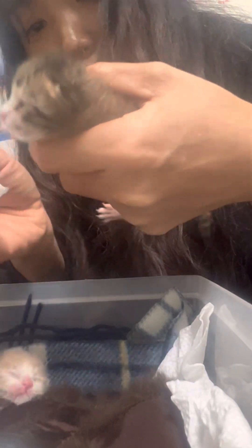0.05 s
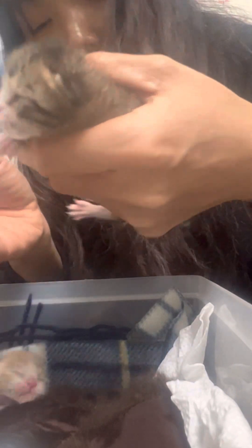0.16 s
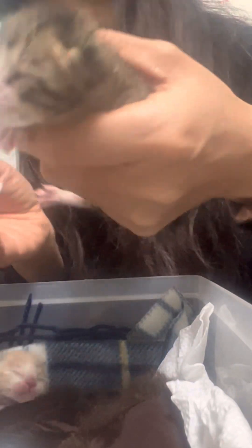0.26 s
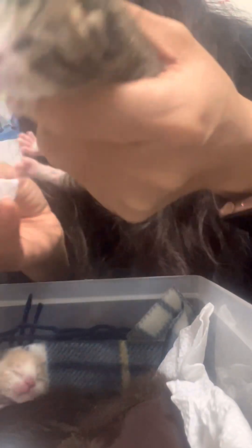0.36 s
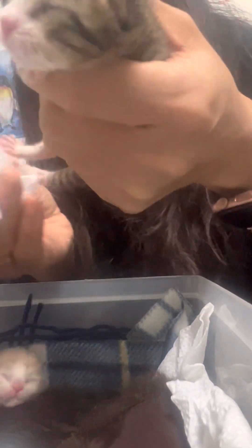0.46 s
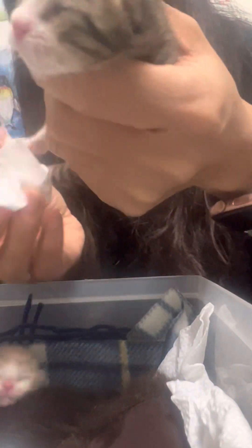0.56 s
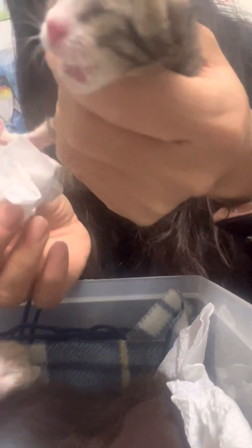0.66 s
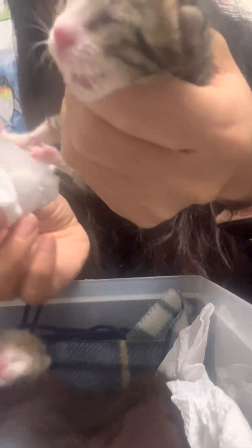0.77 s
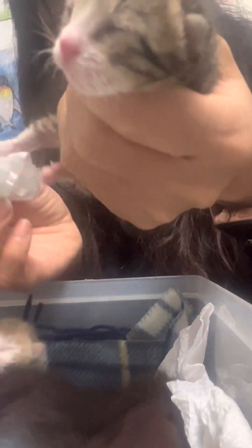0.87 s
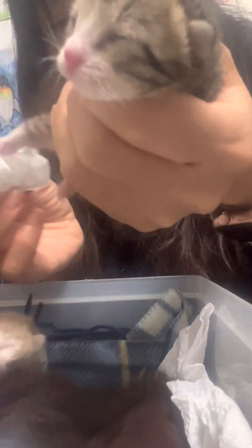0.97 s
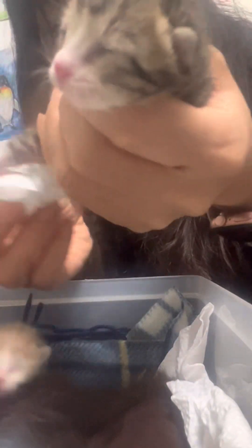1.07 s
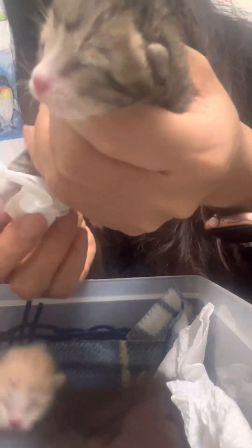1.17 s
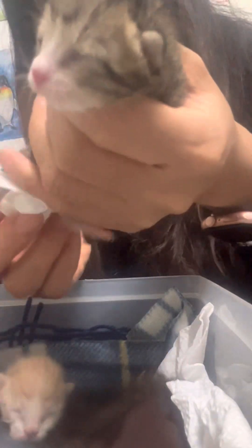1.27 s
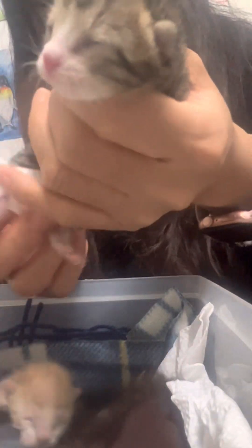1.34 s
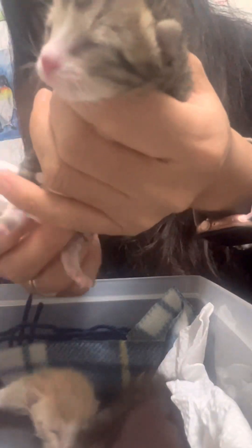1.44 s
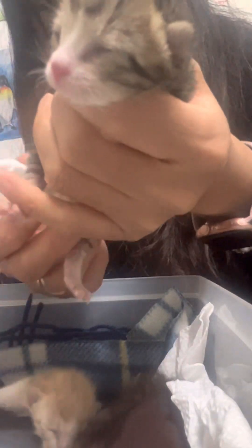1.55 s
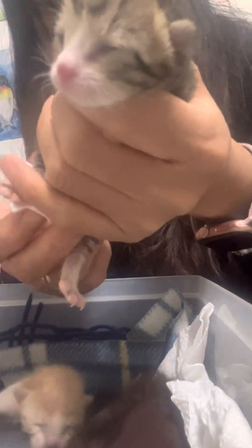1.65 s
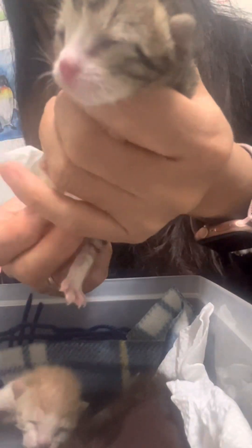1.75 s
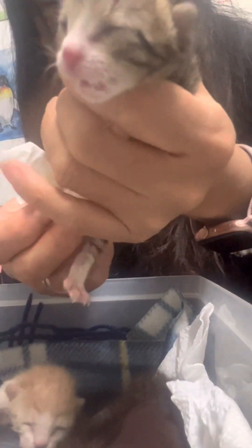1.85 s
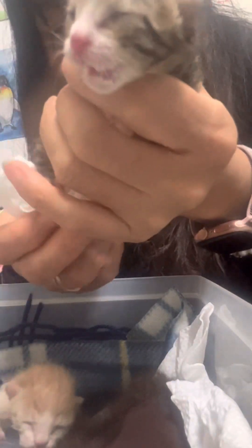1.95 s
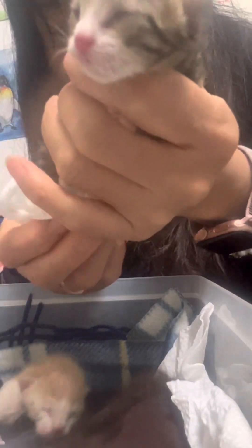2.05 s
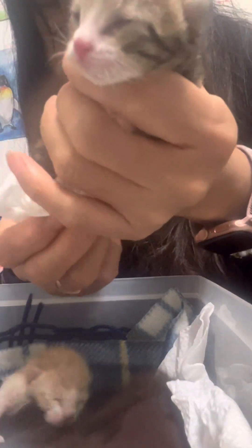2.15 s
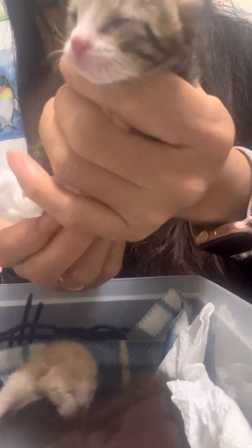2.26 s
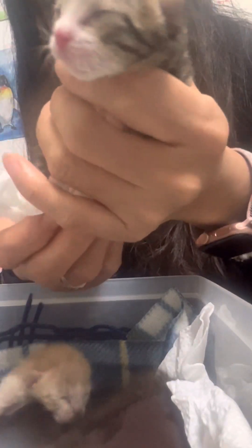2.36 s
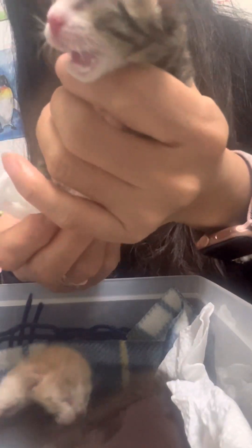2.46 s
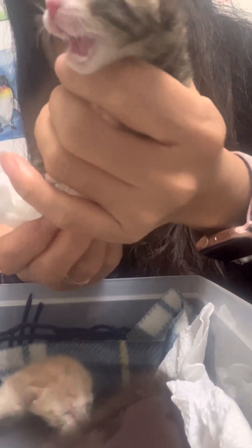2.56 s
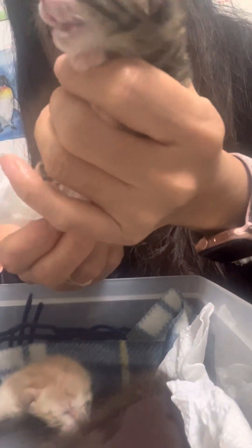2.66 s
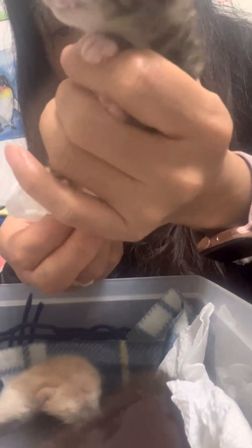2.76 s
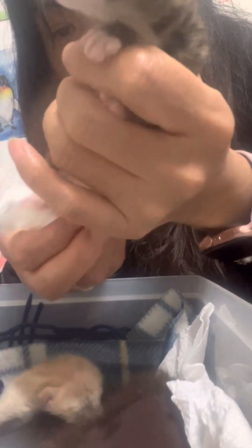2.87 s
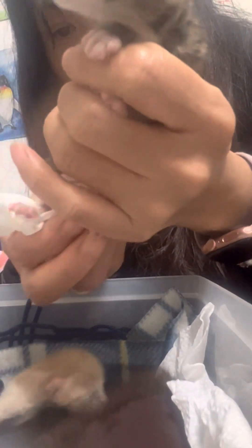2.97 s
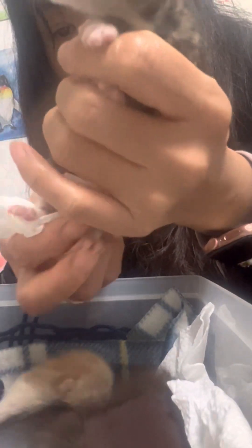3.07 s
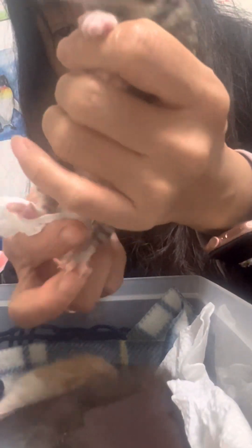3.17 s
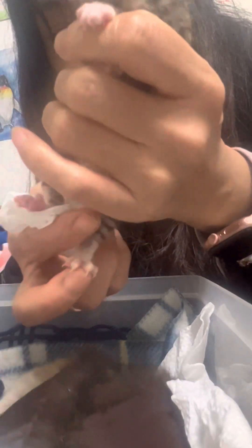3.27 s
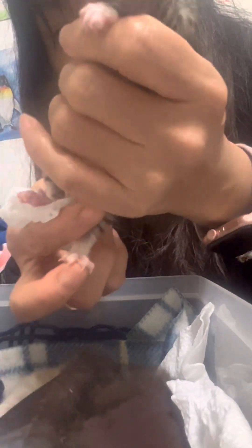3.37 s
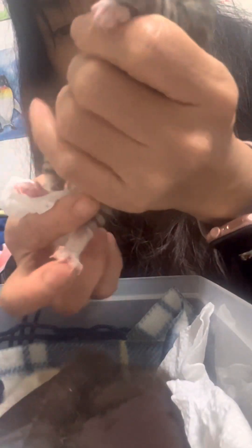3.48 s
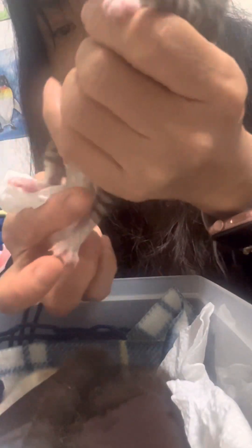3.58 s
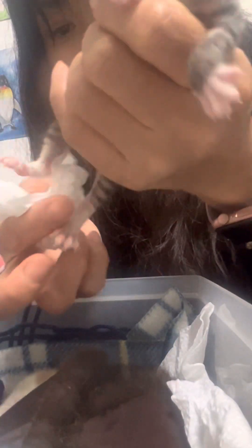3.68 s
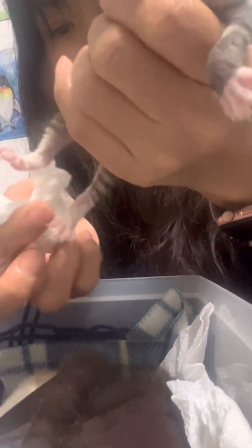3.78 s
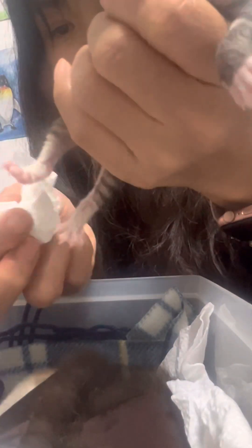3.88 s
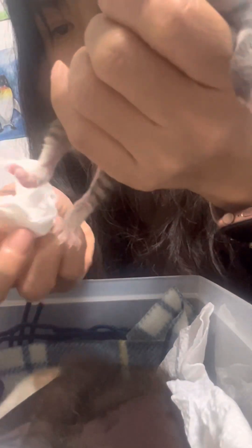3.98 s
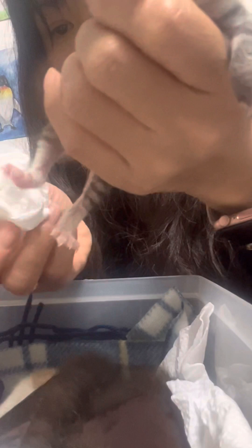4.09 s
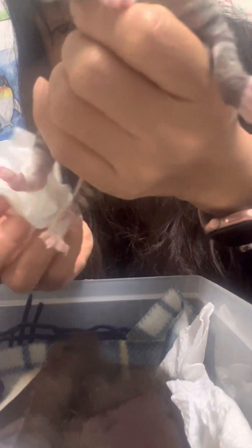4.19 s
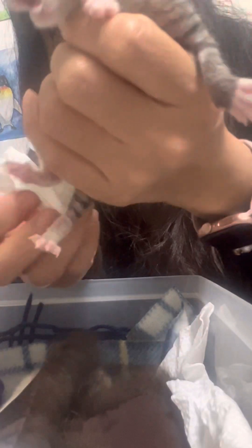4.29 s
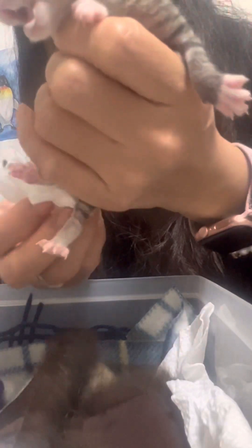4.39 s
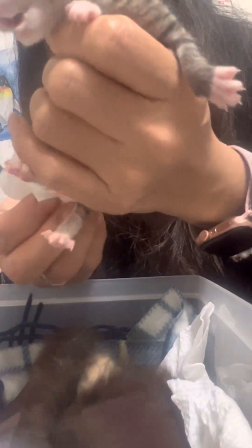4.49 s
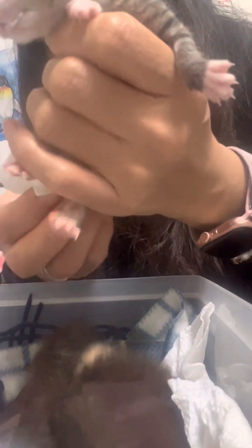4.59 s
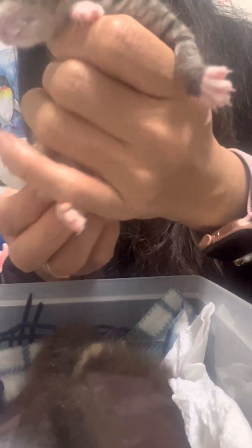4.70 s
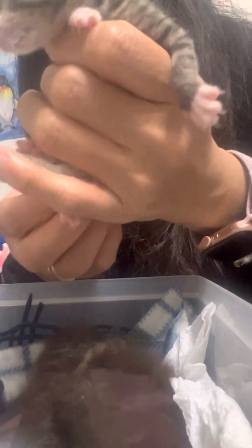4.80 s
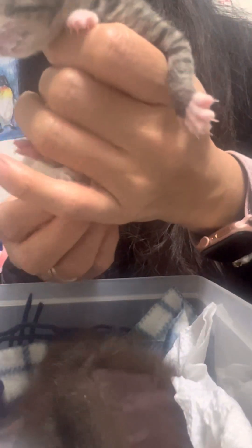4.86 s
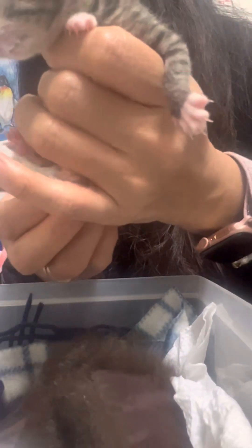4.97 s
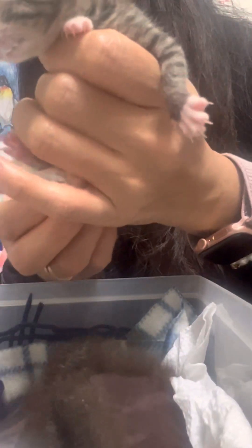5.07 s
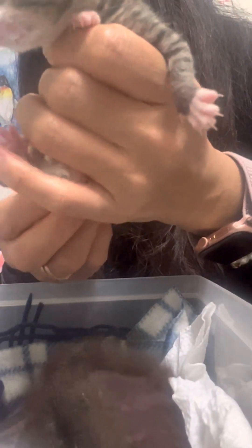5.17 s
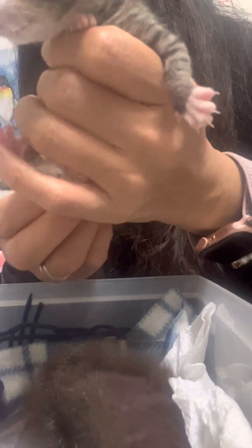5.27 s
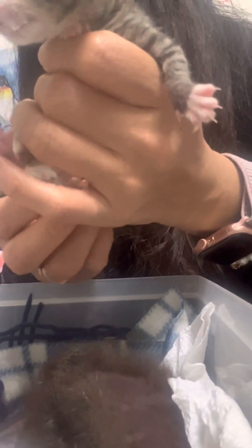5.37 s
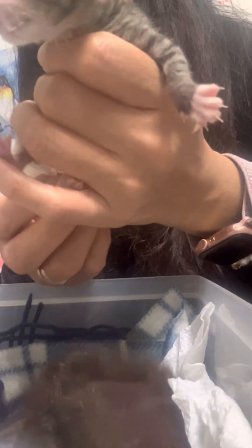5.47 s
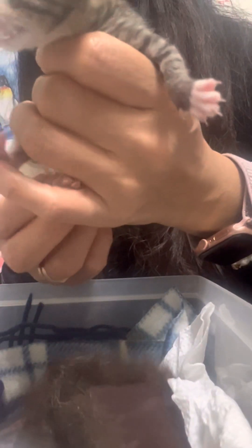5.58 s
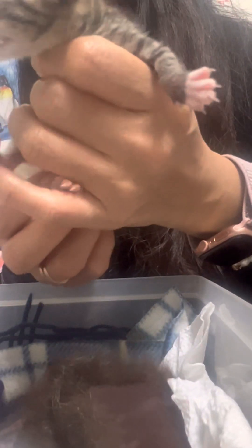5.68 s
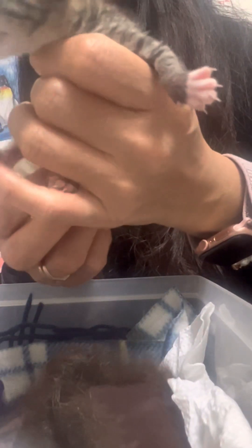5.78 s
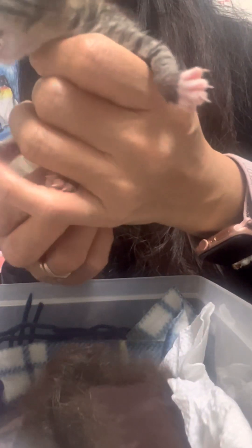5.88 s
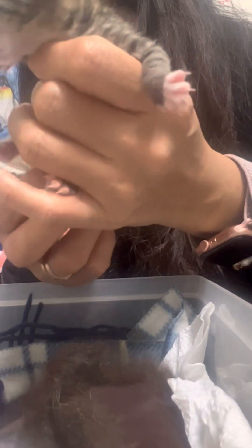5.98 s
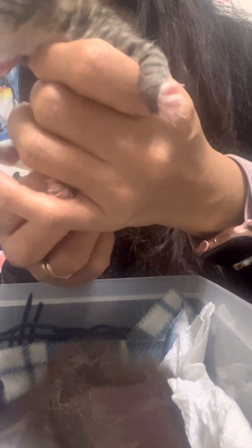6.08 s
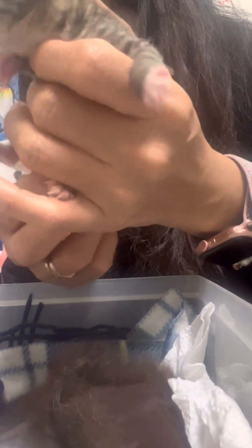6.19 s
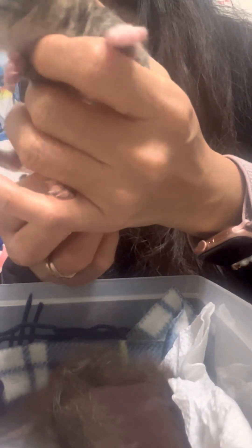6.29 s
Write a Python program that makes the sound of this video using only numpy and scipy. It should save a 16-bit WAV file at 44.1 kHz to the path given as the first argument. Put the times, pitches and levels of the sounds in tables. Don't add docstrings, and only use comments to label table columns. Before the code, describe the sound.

Close phone pickup in a small room: soft tissue rustle and low grip rumble under newborn kitten cries. A littermate's long whines glide up and down first, joined by a loud piercing mew and a cluster of dull knocks. More mews and scuffs follow, the whining stops, and the held kitten carries on alone with a hoarse low mew, a bright wide cry, a weak squeak and a last airy arch.

```python
import sys
import numpy as np
from scipy import signal
from scipy.fft import rfft, irfft, next_fast_len
from scipy.io import wavfile
from scipy.ndimage import uniform_filter1d

SR = 44100
rng = np.random.default_rng(int(sys.argv[2]) if len(sys.argv) > 2 else 0)


def gain_from_db(level_db):
    decades = np.asarray(level_db, float) / 20
    return 10 ** decades


def file_out(sig):
    cols = np.atleast_2d(sig).T
    lim = np.clip(cols, -1, 1)
    pcm = np.round(lim * 32767).astype(np.int16)
    wavfile.write(sys.argv[1], SR, pcm)


N = 279594

# frequency in Hz, level in dB per Hz.
RUSTLE_SPECTRUM = [(180, -38.5), (300, -18.5), (498, -13.5), (670, -17), (719, -10.5), (1180, -15),
                   (1480, -19), (1750, -6.5), (2150, -1), (2550, -7), (3250, -17), (3960, -13.5),
                   (4900, -23), (6490, -20), (8730, -36.5), (11300, -87), (19200, -120)]
# frequency in Hz, level in dB per Hz.
RUMBLE_SPECTRUM = [(15, -41.5), (30, -4.5), (66, 4), (125, -3), (190, -4.5), (360, -10), (600, -56)]
# frequency in Hz, level against the sum in dB.
RUSTLE_SIDE = [(60, -30.5), (100, -18), (180, -27), (310, -13.5), (540, -11.5), (930, -8.5), (1600, -18),
               (2770, -35.5), (4790, -9.5), (8280, 0)]
# frequency in Hz, level in dB per Hz.
HISS_SPECTRUM = [(300, -110), (7000, -108), (9000, -121), (11500, -114), (14000, -115), (15000, -124),
                 (16000, -150)]
# middle in seconds, half length in seconds, level in dB.
WIPES = [(0.0, 0.16, -63.5), (0.607, 0.86, -61), (1.319, 0.2, -61.5), (2.048, 0.35, -60),
         (2.636, 0.23, -59.5), (3.445, 0.38, -65.5), (3.899, 0.055, -66.5), (4.098, 0.12, -69),
         (4.41, 0.42, -60.5), (4.863, 0.58, -66), (5.18, 0.11, -73), (5.454, 0.075, -67), (5.6, 0.46, -69),
         (6.2, 0.45, -63)]
# middle in seconds, half length in seconds, level in dB.
GRIP_SHIFTS = [
    (.2, 0.69, -74),
    (.8, 0.44, -73),
    (1.6, 0.29, -78),
    (2.292, 0.38, -78),
    (3.1, 0.53, -80.5),
    (4.1, 0.12, -79),
    (4.478, 0.37, -70),
    (5.1, 0.38, -73),
    (5.847, 0.45, -69.5),
    (6.34, 0.14, -67.5),
]
# start in seconds, length in seconds, level in dB.
SCRAPES = [
    (0.786, 0.14, -57.5),
    (2.251, 0.027, -55.5),
    (2.303, 0.082, -67.5),
    (2.457, 0.037, -53.5),
    (2.526, 0.13, -70.5),
    (2.66, .08, -61),
    (3.145, 0.1, -69),
]
# start in seconds, peak level in dB, frequency in Hz.
KNOCKS = [(0.774, -51, 171.6), (0.809, -47, 115), (0.829, -49, 260), (0.849, -45.5, 181), (0.865, -48, 130),
          (0.879, -56, 407), (0.908, -52, 83.6), (1.11, -57, 90), (1.617, -55, 105.3), (2.224, -65, 386),
          (2.265, -50, 422), (2.315, -54, 515), (2.365, -51, 453), (2.465, -54, 472), (2.488, -49, 360),
          (2.519, -46.5, 403), (2.544, -49.5, 456), (2.589, -60, 530), (4.037, -58, 119),
          (4.556, -53.5, 317), (4.639, -54, 184), (4.889, -53, 191), (5.056, -67, 236), (5.679, -57.5, 238),
          (6.167, -58.5, 171)]
# start in seconds, peak level in dB, frequency in Hz.
TICKS = [
    (.2868, -34.5, 2150),
    (0.2947, -33.5, 2090),
    (4.256, -54, 7500),
    (4.497, -54, 7000),
    (5.487, -49, 2100),
    (5.666, -50, 2090),
    (2.51, -45, 3600),
]

# frequency in Hz, level in dB.
NEAR_COLOUR = [(300, -8), (800, -8), (1200, -18), (1700, -4), (2300, 0), (2900, -6), (3800, 0), (5200, -6),
               (6500, -6), (7500, -8), (8000, -20), (8500, -36), (9500, -55), (12500, -38), (15000, -55)]
# frequency in Hz, level in dB.
BOX_COLOUR = [(250, -4), (600, 6.5), (1100, -3.5), (1600, 1.5), (2300, -2), (2900, -7.5), (3500, -20.5),
              (4200, -7), (6000, -34), (9500, -42.5)]
# frequency in Hz, level against the sum in dB, phase in radians.
NEAR_PORTS = [(600.0, -7.3, -2.0), (800.0, -2.5, -3.1), (1000.0, 4.3, -3.4), (1200.0, 14.3, -5.0),
              (1500.0, -10.2, -7.1), (1900.0, -18.6, -6.1), (2300.0, -11.0, -6.1), (2800.0, 1.7, -7.2),
              (3300.0, -4.5, -9.6), (3800.0, -2.6, -9.7), (4400.0, -1.8, -9.3), (5000.0, 0.5, -8.4),
              (5800.0, -4.0, -7.4), (7000.0, -2.1, -7.8)]
# frequency in Hz, level against the sum in dB, phase in radians.
BOX_PORTS = [(400.0, -15.2, -1.5), (600.0, -11.0, -1.6), (800.0, -2.8, -1.9), (1100.0, -2.2, -3.5),
             (1400.0, -0.4, -4.4), (1800.0, -16.5, -4.5), (2300.0, -12.8, -4.5), (2900.0, -5.8, -4.7),
             (4000.0, -10.4, -5.4)]

# time in seconds, pitch in Hz, effort in dB.
WHINES = [
    [(0.0, 306, -65.5), (0.062, 261.3, -72.5), (0.078, 286.7, -68.5), (0.15, 342, -67.5),
     (0.205, 335, -67.5)],
    [(0.195, 337, -71), (0.35, 609, -57.5), (0.404, 540, -56.5), (0.534, 553, -58), (0.645, 733.5, -58),
     (0.75, 796, -51), (0.806, 696, -58), (0.914, 381, -66), (0.955, 358, -60.5)],
    [(0.945, 371, -62), (0.992, 373.3, -67), (1.05, 448, -59), (1.085, 595, -57.5), (1.127, 616, -56.5)],
    [(1.124, 650, -54), (1.165, 654, -51.5), (1.19, 669, -51), (1.22, 718, -49), (1.29, 686, -47),
     (1.358, 651, -47.5), (1.375, 559, -53.5), (1.4, 427, -66)],
    [(2.03, 238.4, -63.5), (2.15, 432.6, -58.5), (2.194, 562.6, -56.5), (2.264, 752.6, -53.5),
     (2.38, 794, -54), (2.426, 875, -52), (2.52, 808, -56), (2.634, 608.5, -57.5), (2.72, 388.5, -73)],
]
# mouth resonance in Hz, tilt at full effort in dB per octave.
WHINE_VOICES = [
    (1500, 1.5),
    (1520, 4.5),
    (2200, 4.5),
    (2200, 4.5),
    (2200, 4),
]
# start and end in seconds, frequency in Hz, level in dB.
BOX_TONGUE = [
    (0.77, 1.125, 2100, -6),
    (1.125, 1.37, 2170, 4.5),
    (2.483, 2.52, 1230, -19.5),
    (1.2, 1.36, 1300, -4),
    (1.12, 1.19, 1100, 2),
    (2.19, 2.25, 920, -8),
    (1.125, 1.36, 3900, -4),
    (1.0, 1.125, 3000, -6),
]

# time in seconds, pitch in Hz, effort in dB, mouth resonance in Hz.
EARLY_MEWS = [
    [(0.243, 809, -50.5, 1940), (0.261, 837, -37.5, 1850), (0.267, 836, -43.5, 1820)],
    [(0.56, 801.4, -79, 2167), (0.602, 988, -49, 2060), (0.624, 1028, -37.5, 2190), (0.69, 1177, -28, 2370),
     (0.8, 1122, -27, 2636), (0.93, 818, -38.5, 1870), (0.965, 786, -42, 1600), (1.004, 729, -40.5, 1720),
     (1.012, 704, -47, 1998)],
    [(1.73, 771, -72.5, 1770), (1.765, 850.5, -42, 1850), (1.803, 868.7, -41, 1730),
     (1.871, 837, -40, 2160), (1.9, 775, -38, 2090), (1.927, 747, -40.5, 2010), (1.95, 790, -38.5, 2050),
     (1.977, 812, -37, 2070), (2.007, 805, -37, 2000)],
    [(2.39, 750, -64, 2150), (2.408, 736.7, -40, 2080), (2.44, 792, -36, 2060), (2.5, 827, -36, 2530),
     (2.586, 787, -40, 2020), (2.668, 704.5, -46, 1930), (2.74, 557, -46.5, 1760), (2.749, 530, -55, 1800)],
]
# time in seconds, pitch in Hz, effort in dB, mouth resonance in Hz.
LATE_MEWS = [
    [(3.144, 643.3, -53, 1920), (3.195, 723.3, -43.5, 2000), (3.253, 699, -49.5, 1870),
     (3.335, 789, -42, 2070), (3.409, 721.5, -44, 1860), (3.471, 592.4, -52, 1810),
     (3.511, 631, -50.5, 1730), (3.592, 547, -50.5, 1500)],
    [(4.229, 634, -54, 2120), (4.28, 765.6, -42, 2150), (4.335, 847, -41, 3070), (4.37, 874, -35, 3380),
     (4.422, 925, -36.5, 3350), (4.451, 939, -32.5, 3580), (4.462, 924, -38.5, 3440),
     (4.562, 775, -39, 2800), (4.617, 674, -45.5, 2060)],
    [(5.391, 635, -56, 1900), (5.418, 645, -59, 1950), (5.43, 654, -62, 2000), (5.447, 666, -58.5, 2050),
     (5.471, 630, -48, 1840), (5.479, 614, -54, 1950)],
    [(5.8, 714.5, -62.5, 1650), (5.834, 794, -57.5, 2310), (5.894, 919, -49, 3300),
     (6.022, 1014, -33, 3900), (6.07, 946.4, -34.5, 3870), (6.142, 922, -44, 3170), (6.196, 835, -42, 2300),
     (6.222, 831, -49.5, 1700), (6.295, 728, -46.5, 1500)],
]
# tilt in dB per octave, throat resonance in Hz,
# its strength in dB, roughness gained per dB of lost effort.
MEW_VOICES = [
    (3.5, 4400, -23.5, -0.5),
    (1.5, 5450, -24, -0.1),
    (1.4, 3430, -15, -0.5),
    (-0.5, 3650, -10.5, 0.028),
    (3, 3350, -13.5, -0.1),
    (0, 7700, -11, .03),
    (2, 3300, -18.5, -4),
    (-2.5, 6900, -11.5, .018),
]
# share of the voice 0-1, onset in seconds, # hiss at the teeth against that
# in the mouth 0-1, frequency in the mouth in Hz.
MEW_AIR = [
    (.03, .26, .2, 3900),
    (.035, .8, .15, 3000),
    (.03, 1.93, .2, 3900),
    (.04, 2.51, .5, 3900),
    (.07, 3.2, .9, 3900),
    (.065, 4.449, .35, 4100),
    (.06, 5.46, .2, 3900),
    (.055, 5.88, .3, 4100),
]
# start in seconds, peak level in dB, frequency in Hz.
GULPS = [
    (0.263, -34, 796),
    (1.007, -37, 840),
    (2.006, -26.5, 813),
    (2.745, -38.5, 862),
    (3.592, -49.5, 877),
    (4.617, -48, 880),
    (5.474, -50, 780),
    (6.287, -48, 904),
]
# start in seconds, end in seconds.
GAPES = [
    (.61, 0.93),
    (1.83, 2.04),
    (2.419, 2.92),
    (3.21, 3.5),
    (4.257, 4.5),
    (5.85, 6.15),
]
# middle in seconds, half length in seconds, level in dB.
THROAT_RINGS = [
    (0.66, 0.095, 5.5),
    (0.826, 0.011, 5),
    (2.567, 0.08, 7),
    (2.665, 0.057, 1.5),
    (3.432, 0.15, 6),
    (4.321, 0.048, 8.5),
    (5.872, 0.068, 4),
    (6.02, 0.041, 1.5),
]
# start in seconds, end in seconds, frequency in Hz, level in dB.
TONGUE = [(2.483, 2.52, 1650, -9.5), (2.508, 2.6, 4030, 6), (2.45, 2.6, 6300, 1.5), (2.6, 2.69, 5700, 6),
          (2.67, 2.745, 4000, 5.5), (2.69, 2.76, 5990, -17), (3.14, 3.225, 2140, 3.5),
          (3.14, 3.25, 3000, -6), (3.24, 3.31, 7140, 9.5), (3.33, 3.43, 5900, 6.5), (3.3, 3.7, 3360, 4),
          (3, 3.45, 4940, -2.5), (3.47, 3.6, 6200, -10), (3.8, 3.9, 4300, 2.5), (3.51, 3.6, 1600, 3.5),
          (4.265, 4.34, 6500, 5), (4.35, 4.41, 7170, 7), (4.26, 4.44, 5400, -3.5), (4.41, 4.45, 7500, -7),
          (4.27, 4.35, 3950, 5.5), (4.52, 4.59, 3400, 2.5), (4.53, 4.62, 6500, -8.5),
          (5.385, 5.47, 3500, 6.5), (5.385, 5.49, 2700, -14.5), (5.385, 5.49, 1250, -13),
          (5.86, 5.97, 4700, 10.5), (5.97, 6.13, 3970, 3), (4.5, 8.9, 9500, 1.5), (5.97, 6.9, 5880, 0.5),
          (6.12, 6.19, 5230, 13.5), (6.21, 5, 5200, -8), (6.24, 6.3, 1560, 9), (.75, .87, 3350, 5.5),
          (0.98, 1.01, 2320, -1), (1.7, 1.93, 2600, -2), (3.46, 4.3, 7200, -14), (2.62, 2.76, 7500, -10),
          (6.15, 6.3, 6500, -10.5), (5.85, 6.15, 7970, -9.5), (4.45, 4.48, 6600, 6.5),
          (0.71, .72, 9000, 13), (1.79, 1.95, 8890, 32), (2.42, 2.58, 9050, 26), (4.28, 4.49, 9000, 21.5),
          (5.85, 6.04, 8900, 22.5), (4.37, 4.45, 3700, 2), (.64, .82, 5200, 4), (2.4, 2.47, 2300, 2),
          (.62, .76, 4900, -4), (4.5, 4.62, 7800, -9)]
# start
# in seconds, end in seconds, frequency in Hz, level in dB.
MORE_TONGUE = [(.24, .28, 3400, -7), (.24, .28, 4250, -6), (.24, .28, 5100, -22), (3.14, 3.2, 5000, -8),
               (1.9, 2.0, 3200, 3), (.24, .265, 850, -7), (0.724, 0.829, 4600, 6), (1.78, 1.871, 5560, -13),
               (1.863, 1.96, 1200, -3), (1.999, 2.01, 1800, 7), (2.458, 2.506, 3250, 5.5),
               (2.518, 2.559, 1610, 5.5), (3.202, 3.26, 1419, -4), (3.52, 3.588, 2900, -6),
               (4.363, 4.5, 1850, 5.5), (4.395, 4.49, 2760, -8.5), (5.82, 5.988, 2800, -6.5),
               (6.17, 6.3, 800, -3.5)]
# time in seconds, strength 0-1, length in seconds.
CRACKS = [(1.009, 0.92, 0.0021), (1.381, 0.64, 0.013), (2.521, 0.02, 0.0075), (2.742, 0.24, 0.0088),
          (3.155, 0.33, 0.013), (3.222, 0.17, 0.02), (4.235, 0.35, 0.005), (6.071, 0.14, 0.012),
          (3.478, .3, .025), (.1, 0.28, .12), (0.808, 0.06, 0.0073), (4.62, 0.4, 0.014), (5.392, 0.5, .005),
          (5.481, 0.27, 0.01), (6.272, 0.03, 0.014)]
# time in seconds, share of the pitch, length in seconds.
CATCHES = [(0.762, 0.016, .005), (.808, 0.015, .006), (2.004, -0.038, 0.0033), (3.151, .03, 0.0041),
           (3.383, 0.014, 0.0096), (4.264, 0.014, .01), (4.302, 0.011, .012), (4.339, 0.014, .008),
           (4.47, .01, .01), (4.535, -0.0085, .012), (5.892, 0.0076, .012), (6.008, .008, .01),
           (6.149, 0.013, 0.0095), (1.216, 0.01, 0.011), (1.104, -0.014, .015), (2.197, .03, 0.0078),
           (2.257, .02, .008), (2.226, -.035, .018), (4.517, -.012, .015), (6.058, 0.022, .012),
           (6.238, -0.026, .01), (3.318, .014, 0.014), (3.354, -0.015, 0.0086)]

STILL_RUSTLE_DB, STILL_RUMBLE_DB = -78, -83.5
SCRAPE_RISE_S, SCRAPE_FALL_DB_PER_S = 0.0041, 329
MASK_FROM_DB, MASK_SPAN_DB, MASK_DEPTH = -71, 6.5, .97
DUCK_DB, DUCK_FROM_DB = -2, -49.5

STEP = 16
LINES = 15
WAVER_SHARE, WAVER_HZ = .003, 22
TILT_DB_PER_LOST_DB, THROAT_DB_PER_LOST_DB, ROUGHEST = -0.1736, 0.38, 0.26
TILT_DB_PER_MOUTH_OCTAVE, THROAT_DB_PER_MOUTH_OCTAVE = -6, 16.5
THROAT_FOLLOWS_MOUTH = 0.36
WIDE_MOUTH_SHARPENS = 0.47
TOP_RING_DB = 2.5
SHUT_TOP_DB, SHUT_ABOVE_HZ = -12.5, 4700
TONGUE_WIDTH_HZ, TONGUE_MOVE_S = 565, .008
RISING_ROUGH_SHARE, STEADY_HAZE, TIRED_HAZE = 0.35, 0.089, 0.17
AIR_TOP_HZ, AIR_WIDTH_HZ, TEETH_HZ = 7500, 700, 6700
AIR_BEFORE_PEAK, AIR_RISE_S, AIR_FADE_S = .18, .012, .12
ATTACK_S, RELEASE_S, GULP_S = .003, .002, .011


def evened(x):
    return x / np.sqrt(np.mean(abs(x) ** 2) + 1e-20)


def read(points, hz, column=1):
    table = np.asarray(points)
    return np.interp(np.log(hz + 1), np.log(table[:, 0] + 1), table[:, column])


def add(mix, s, sound):
    part = mix[round(s * SR):][:len(sound)]
    part += sound[:len(part)]


def wobble(length, hz, rate=SR, count=1):
    settle = rate // 20
    noise = rng.standard_normal((count, length + settle))
    x = signal.lfilter(*signal.butter(2, hz / rate * 2), noise)[:, settle:]
    return np.squeeze(x / x.std(1, keepdims=True))


def swells(t, events, still_db):
    power = sum((gain_from_db(db) * np.exp(-((t - s) / half) ** 2)) ** 2 for s, half, db in events)
    return np.sqrt(gain_from_db(still_db) ** 2 + power)


def ports(x, table):
    size = next_fast_len(N)
    hz = np.fft.rfftfreq(size, 1 / SR)
    gain = gain_from_db(read(table, hz)) * np.minimum(hz / 450, 1)
    phase = np.exp(1j * read(table, hz, column=2))
    side = irfft(rfft(x, size) * gain * phase, size)[:N]
    return np.array([x + side, x - side])


def room(x, t60, level_db):
    t = np.arange(SR // 4) / SR
    signs = rng.choice([-1., 1.], (2, len(t)))
    sparse = rng.random((2, len(t))) < .05
    taps = signs * sparse * gain_from_db(-60 * t / t60) * (t > .003)
    return gain_from_db(level_db) * signal.fftconvolve(x[None], taps / np.linalg.norm(taps[0]), axes=1)[:, :N]


def hush():
    frames, hz = N // 256 + 5, np.fft.rfftfreq(1024, 1 / SR)
    t = np.arange(frames) * 256 / SR
    a, b, c, d, patches = rng.standard_normal((frames, 513, 5)).T
    patches = evened(uniform_filter1d(uniform_filter1d(patches, 12, 0), 10, 1))
    rustle, rumble = gain_from_db(read(RUSTLE_SPECTRUM, hz)), gain_from_db(read(RUMBLE_SPECTRUM, hz))
    rustle = rustle / np.linalg.norm(rustle[hz > 1800])
    rumble = rumble / np.linalg.norm(rumble)
    wiping = np.outer(rustle, swells(t, WIPES, STILL_RUSTLE_DB))
    gripping = np.outer(rumble, swells(t, GRIP_SHIFTS, STILL_RUMBLE_DB))
    field = np.hypot(wiping, gripping) * gain_from_db(2.1 * patches)
    field = np.hypot(field, gain_from_db(read(HISS_SPECTRUM, hz))[:, None])
    mid = a + 1j * b
    side = (c + 1j * d) * gain_from_db(read(RUSTLE_SIDE, hz))[:, None]
    spectra = field * np.array([mid + side, mid - side])
    return gain_from_db(3.5) * signal.istft(spectra, nperseg=1024, noverlap=768)[1][:, :N]


def suppress(floor, voices):
    def band(x, edges):
        return signal.sosfiltfilt(signal.butter(6, edges, "band", fs=SR, output="sos"), x)

    def level_db(x):
        return 10 * np.log10(abs(uniform_filter1d((x ** 2).mean(0), size=2000)) + 1e-12)

    bright_db = level_db(band(voices, [5000, 8000]))
    masked = MASK_DEPTH * np.clip((bright_db - MASK_FROM_DB) / MASK_SPAN_DB, 0, 1)
    floor = floor - masked * band(floor, [8100, 11000])
    return floor * gain_from_db(DUCK_DB * np.clip((level_db(voices) - DUCK_FROM_DB) / 10, 0, 1))


def scrape():
    t = np.arange(N) / SR
    level = 0
    for s, length, db in SCRAPES:
        fall_db = SCRAPE_FALL_DB_PER_S * np.maximum(t - s - length, 0)
        level = level + gain_from_db(db - fall_db) * np.clip((t - s) / SCRAPE_RISE_S, 0, 1)
    slips = rng.standard_normal(N) * gain_from_db(3.2 * wobble(N, 90))
    return level * evened(signal.lfilter(*signal.butter(2, [300 / SR * 2, 1300 / SR * 2], "band"), slips))


def handling():
    out, t = np.zeros(N), np.arange(5000) / SR
    for s, db, hz in KNOCKS:
        loose = .5 + 0.59 * wobble(len(t), 140) + 0.22 * wobble(len(t), 700)
        ring = np.sin(2 * np.pi * hz * t) * np.minimum(t / 0.0043, 1)
        add(out, s, gain_from_db(db - 60 * t / 0.13) * loose * ring)
    for s, db, hz in TICKS:
        body = np.sin(2 * np.pi * hz * t) + 0.32 * np.sin(2 * np.pi * 1.95 * hz * t)
        body = body + 0.2 * rng.standard_normal(len(t))
        add(out, s, gain_from_db(db - 60 * t / 0.0056) * body)
    return signal.lfilter(*signal.butter(8, 8000 / SR * 2), out)


def moments(t, events):
    return sum(size * np.exp(-((t - at) / length) ** 2) for at, size, length in events)


def line_wobble(t, hz):
    return wobble(len(t), hz, SR // STEP, count=LINES)


def fold_pitch(t, pitch):
    for _ in range(2):
        pitch = uniform_filter1d(pitch, size=30, mode="nearest")
    return pitch * (1 + WAVER_SHARE * wobble(len(t), WAVER_HZ, SR // STEP) + moments(t, CATCHES))


def tract(f, hz, width_hz):
    return 1j * width_hz / hz / (1 - (f / hz) ** 2 + 1j * f * width_hz / hz ** 2)


def mouth_and_throat(t, f, mouth, width_hz, throat, throat_db, effort_db):
    gape = sum(np.interp(t, [a - .015, a + 0.0082, b - .02, b + 0.014], [0, 1, 1, 0]) for a, b in GAPES)
    closed = 1 + (f / mouth / 1.9) ** 6
    width_hz = width_hz * (2100 / mouth) ** WIDE_MOUTH_SHARPENS
    shape = tract(f, mouth, width_hz) / closed
    shape = shape - gain_from_db(throat_db) * tract(f, throat, width_hz=1390) * f / throat
    shape = shape * gain_from_db(SHUT_TOP_DB * (1 - gape) / (1 + (SHUT_ABOVE_HZ / f) ** 8))
    return shape + gape * gain_from_db(TOP_RING_DB + effort_db) * (f > 10000)


def tongue_shading(t, f, moves):
    shading_db = 0
    for a, b, hz, db in moves:
        if a < t[-1] and b > t[0]:
            held = np.clip(np.minimum(t - a, b - t) / TONGUE_MOVE_S + .5, 0, 1)
            shading_db = shading_db + db * held * np.exp(-((f - hz) / TONGUE_WIDTH_HZ) ** 2)
    return shading_db


def hoarse_air(t, f, hoarse, end_s):
    share, tires_s, teeth, air_hz = hoarse
    in_mouth = np.exp(-((f - air_hz) / AIR_WIDTH_HZ) ** 2 / 2)
    at_teeth = teeth * np.exp(-((f - TEETH_HZ) / AIR_WIDTH_HZ) ** 2 / 2)
    air = (in_mouth + at_teeth) / (1 + (f / AIR_TOP_HZ) ** 30)
    air = air * (line_wobble(t, 480) + 1j * line_wobble(t, 480))
    onset = np.clip((t - tires_s) / AIR_RISE_S, AIR_BEFORE_PEAK, 1)
    return share * air * onset * np.clip((end_s - t) / AIR_FADE_S, .15, 1)


def sing(start_s, end_s, t, pitch, lines):
    fine = np.arange(start_s, end_s, 1 / SR)
    turn = np.exp(2j * np.pi * np.cumsum(np.interp(fine, t, pitch)) / SR)
    sound = 0
    for line in lines[::-1]:
        sound = (sound + np.interp(fine, t, line)) * turn
    edges = np.clip(np.minimum((fine - start_s) / ATTACK_S, (end_s - fine) / RELEASE_S), 0, 1)
    return -np.sqrt(2) * sound.real * edges


def cry(rows, voice, colour, width_hz, breath_db, hoarse, tongue):
    s, *columns = np.transpose(rows)
    t, k = np.arange(s[0], s[-1] + STEP / SR, STEP / SR), np.arange(1, LINES + 1)[:, None]
    pitch, effort_db, mouth = (uniform_filter1d(np.interp(t, s, c), size=9, mode="nearest") for c in columns)
    pitch = fold_pitch(t, pitch)
    f = k * pitch

    full_tilt_db, throat, full_throat_db, roughening = voice
    lost_db = np.minimum(effort_db.max() - effort_db, 25)
    narrowing = np.log2(mouth / mouth.max())
    tilt_db = full_tilt_db + TILT_DB_PER_LOST_DB * lost_db + TILT_DB_PER_MOUTH_OCTAVE * narrowing
    throat_db = full_throat_db + THROAT_DB_PER_LOST_DB * lost_db + THROAT_DB_PER_MOUTH_OCTAVE * narrowing
    throat_db = throat_db + sum(db * np.exp(-((t - at) / half) ** 4) for at, half, db in THROAT_RINGS)
    throat = throat * (mouth / mouth.max()) ** THROAT_FOLLOWS_MOUTH
    rising = t < t[effort_db.argmax()]
    rough = np.clip(roughening * lost_db, 0, ROUGHEST) * np.where(rising, RISING_ROUGH_SHARE, 1)

    shape = mouth_and_throat(t, f, mouth, width_hz, throat, throat_db, effort_db)
    line_db = tongue_shading(t, f, tongue) + read(colour, f) + tilt_db * np.log2(k)
    part = shape * gain_from_db(line_db + 1.45 * line_wobble(t, 15.6))

    flutter = rough * (line_wobble(t, 57) + 1j * line_wobble(t, 100))
    haze = gain_from_db(breath_db) * k + moments(t, CRACKS) + (STEADY_HAZE + rough) * (f / 6500) ** 2
    haze = haze + TIRED_HAZE * rough
    breath = haze * (line_wobble(t, 180) + 1j * line_wobble(t, 170))
    voiced = part * (1 + flutter + breath) / np.linalg.norm(part, axis=0)
    lines = gain_from_db(effort_db) * (voiced + hoarse_air(t, f, hoarse, s[-1]))
    jitter = (0.0031 + 0.013 * rough) * wobble(len(t), 89, SR // STEP)
    return s[0], sing(s[0], s[-1], t, pitch * (1 + jitter), lines)


def littermate():
    out = np.zeros(N)
    for rows, (mouth_hz, tilt_db) in zip(WHINES, WHINE_VOICES):
        curve = [tuple(row) + (mouth_hz,) for row in rows]
        air = (.008, rows[-2][0], 0, 3900)
        voice = (tilt_db, 4200, -20, .007)
        add(out, *cry(curve, voice, BOX_COLOUR, width_hz=790, breath_db=-46.0, hoarse=air, tongue=BOX_TONGUE))
    return gain_from_db(8) * out


def kitten():
    out, t = np.zeros(N), np.arange(1200) / SR
    moves = list(TONGUE) + list(MORE_TONGUE)
    for rows, voice, air in zip(list(EARLY_MEWS) + list(LATE_MEWS), MEW_VOICES, MEW_AIR):
        add(out, *cry(rows, voice, NEAR_COLOUR, width_hz=763, breath_db=-43.5, hoarse=air, tongue=moves))
    for s, db, hz in GULPS:
        tone = np.sin(2 * np.pi * hz * t) + .4 * np.sin(2 * np.pi * 2.05 * hz * t)
        add(out, s, gain_from_db(db - 8) * tone * np.sin(np.pi * np.minimum(t / GULP_S, 1) ** 0.65))
    return out


def scene():
    near, low = kitten(), littermate()
    voices = ports(near, NEAR_PORTS) + ports(low, BOX_PORTS)
    walls = room(near + low, 0.18, level_db=-18)
    touches = ports(handling() + scrape(), BOX_PORTS)
    return voices + walls + touches + suppress(hush(), voices)


def low_pass(x):
    return signal.sosfilt(signal.butter(12, 15700, fs=SR, output="sos"), x)


def record(dry):
    mix = signal.lfilter(*signal.butter(2, 45 / SR * 2, "high"), dry)
    return low_pass(mix)


dry = scene()
out = record(dry)
file_out(out)
```